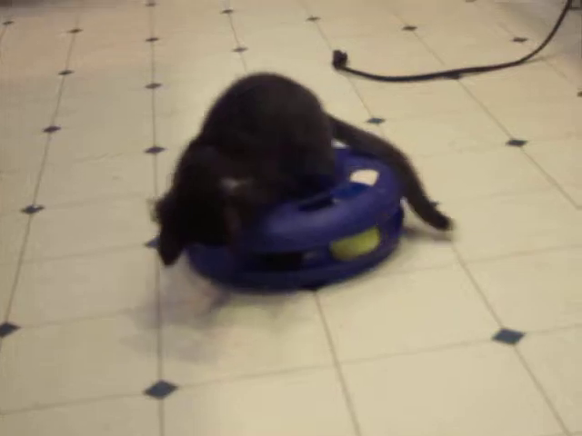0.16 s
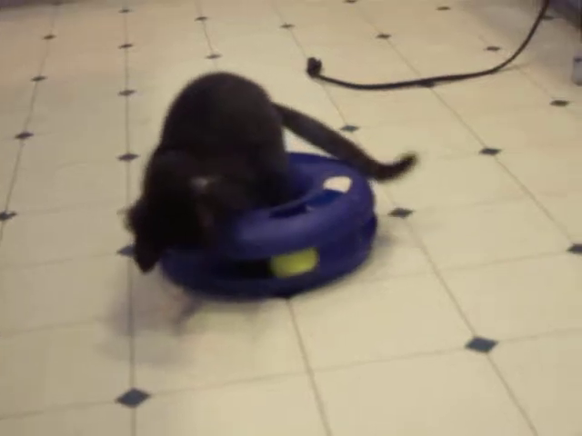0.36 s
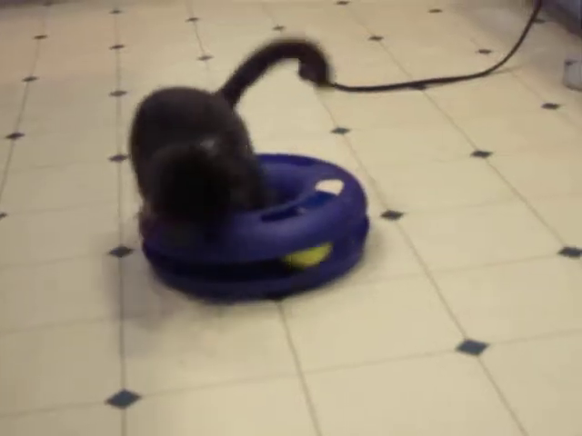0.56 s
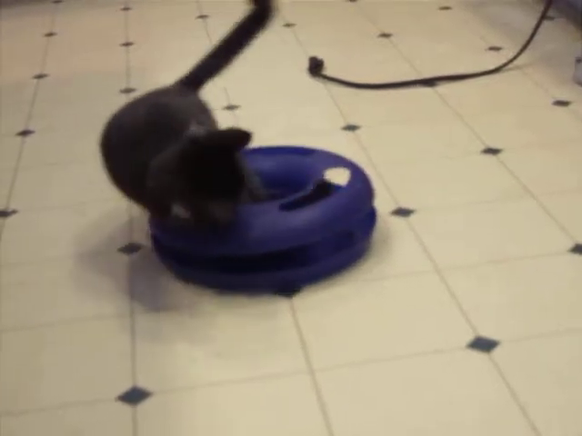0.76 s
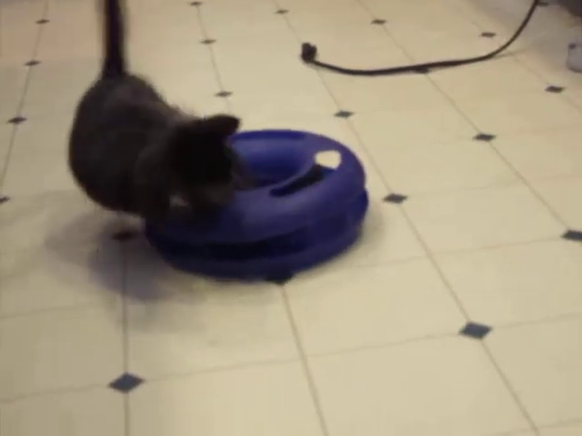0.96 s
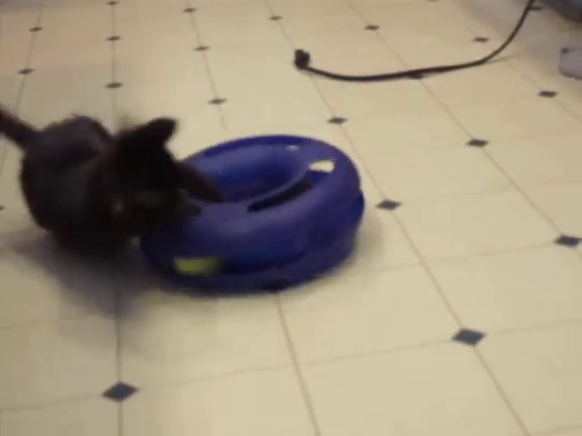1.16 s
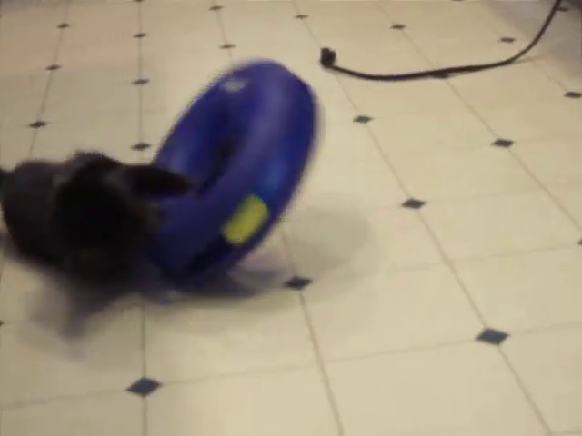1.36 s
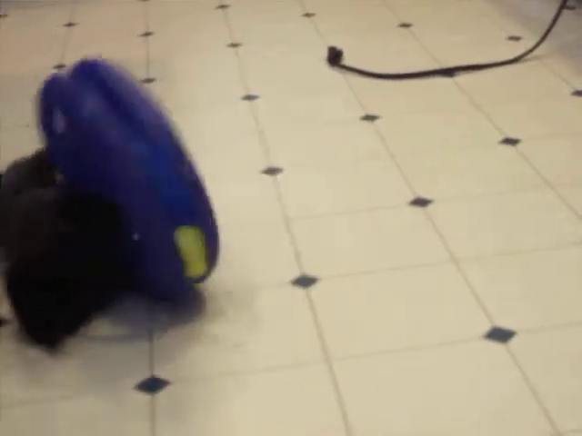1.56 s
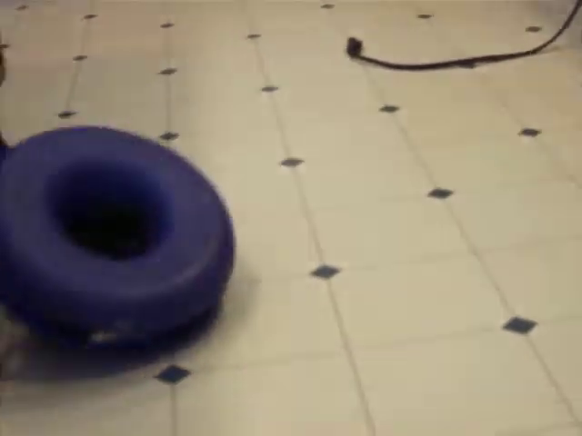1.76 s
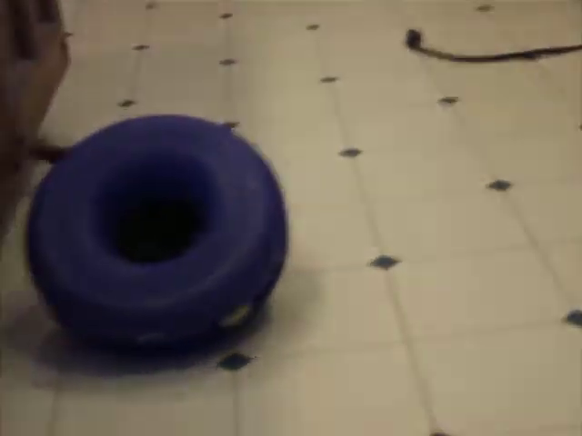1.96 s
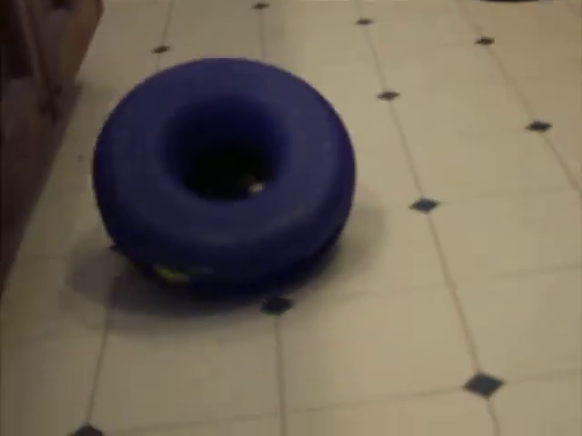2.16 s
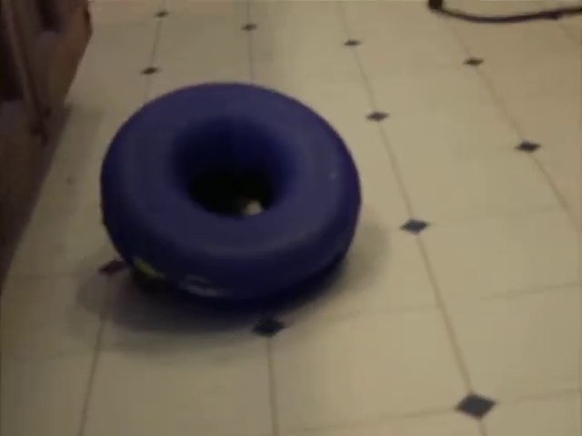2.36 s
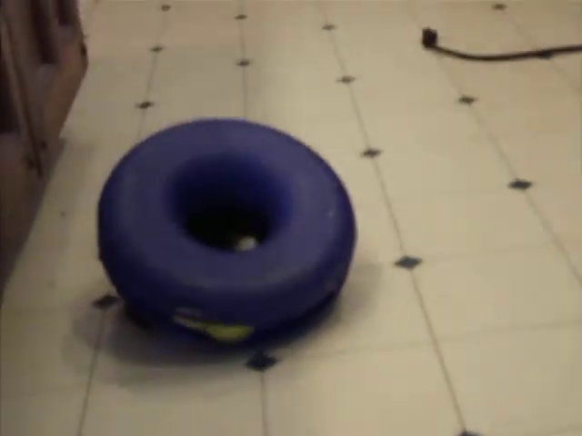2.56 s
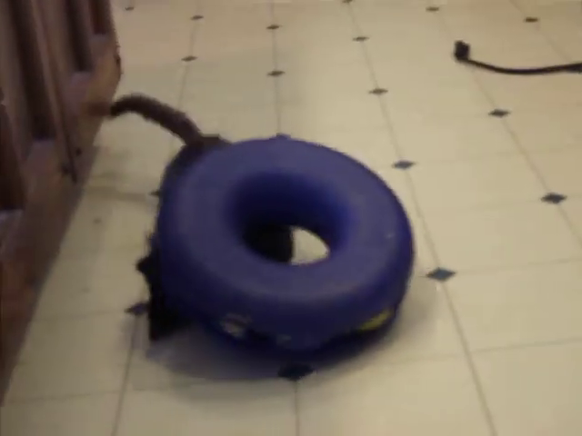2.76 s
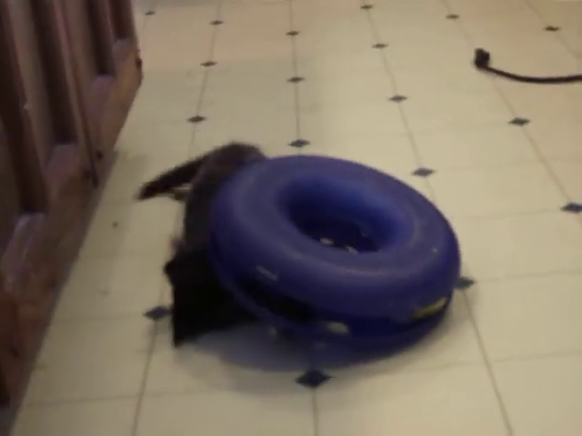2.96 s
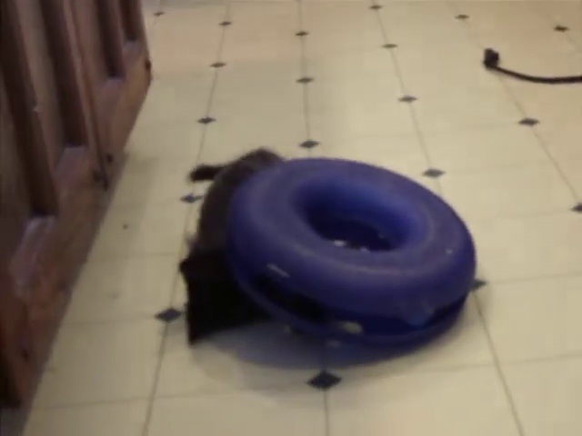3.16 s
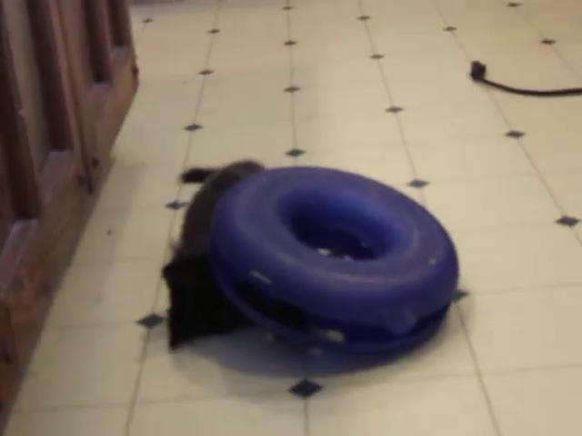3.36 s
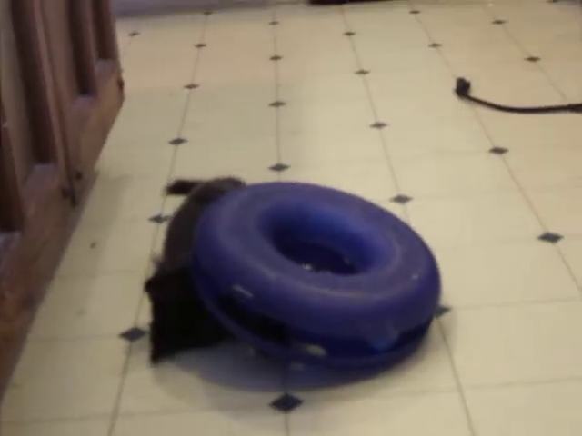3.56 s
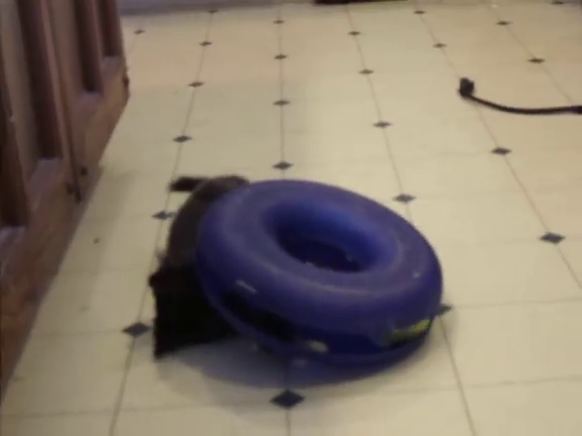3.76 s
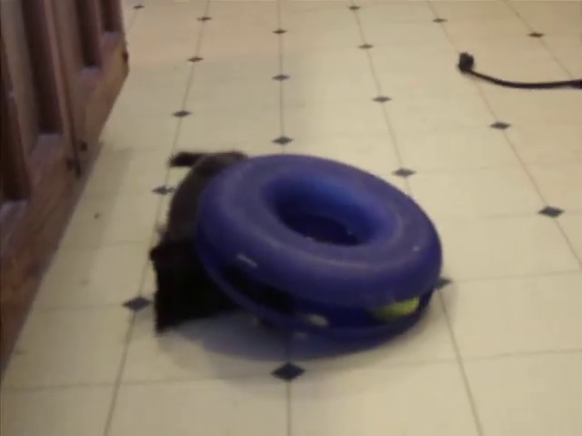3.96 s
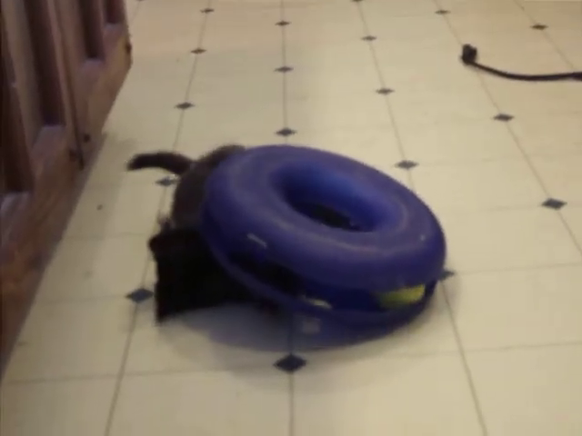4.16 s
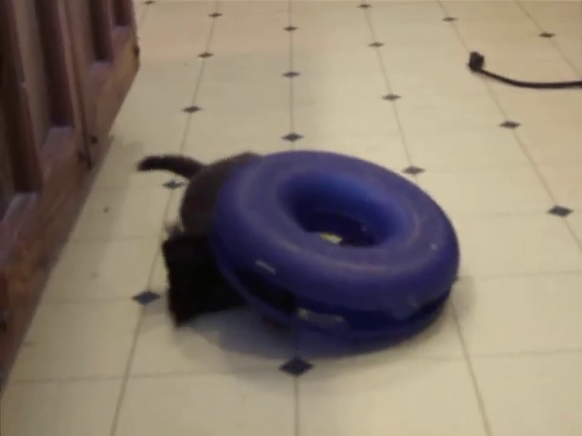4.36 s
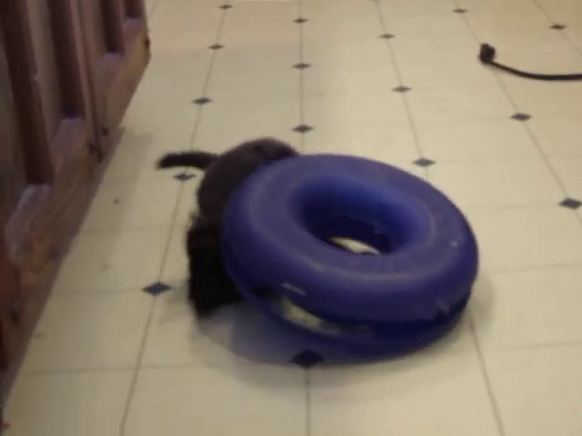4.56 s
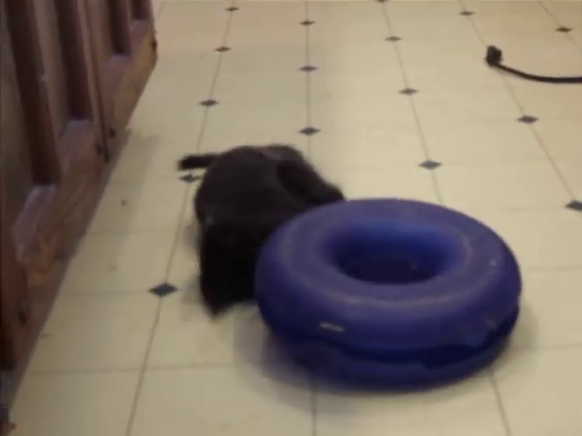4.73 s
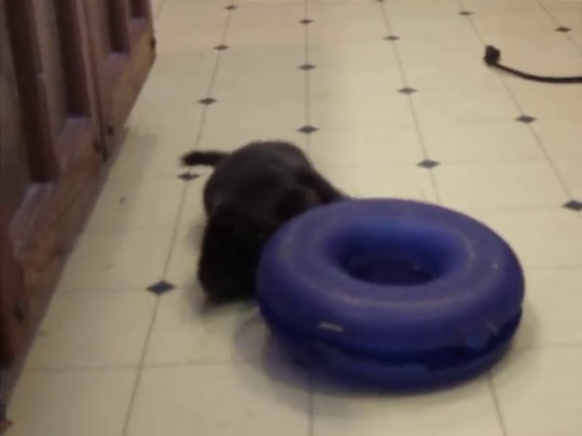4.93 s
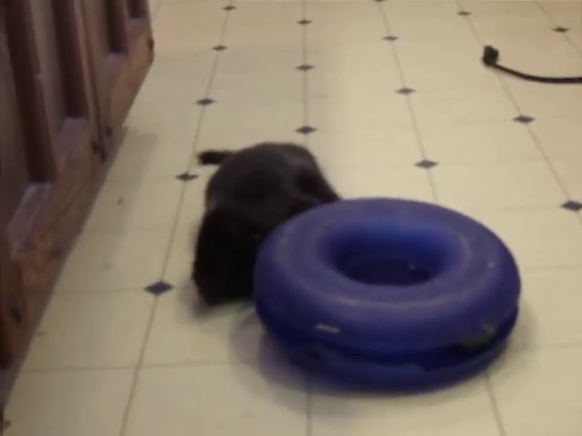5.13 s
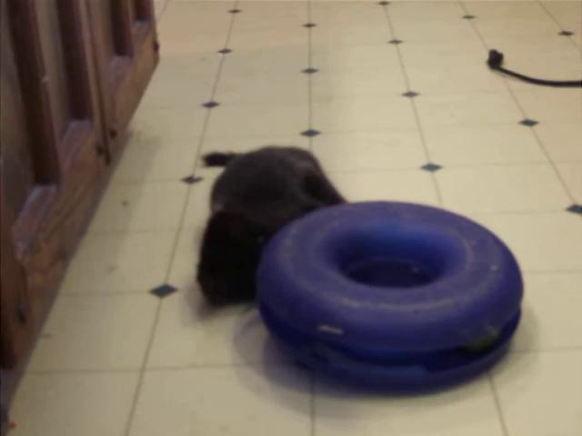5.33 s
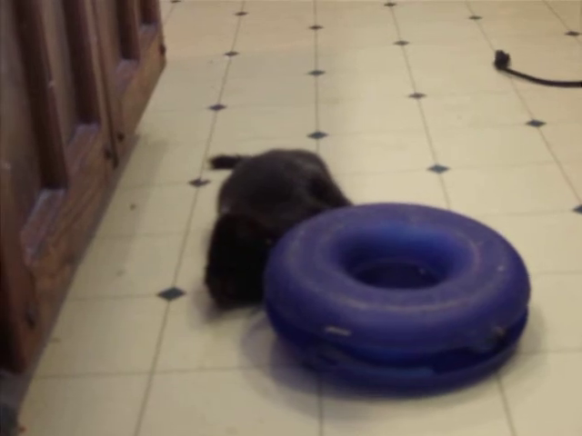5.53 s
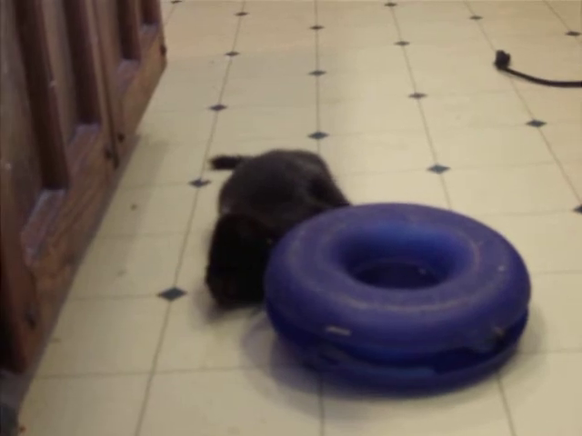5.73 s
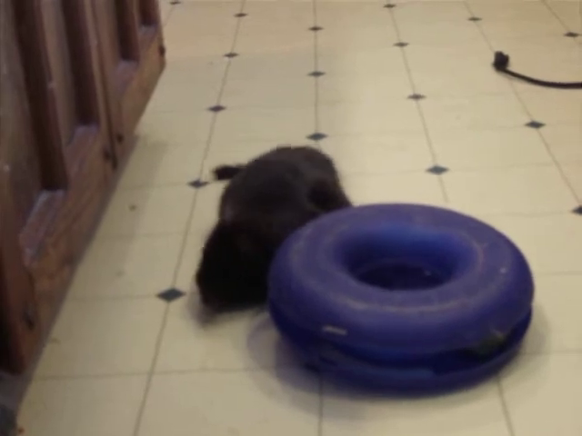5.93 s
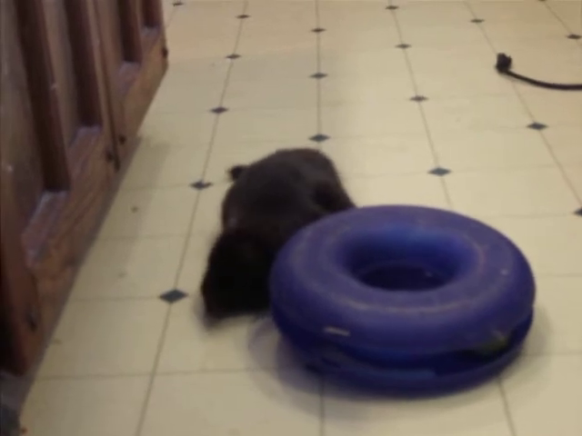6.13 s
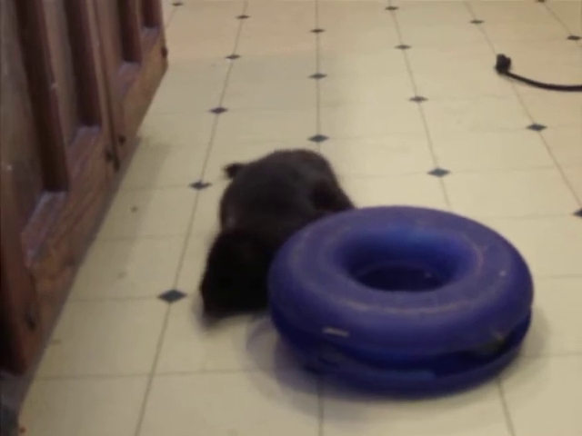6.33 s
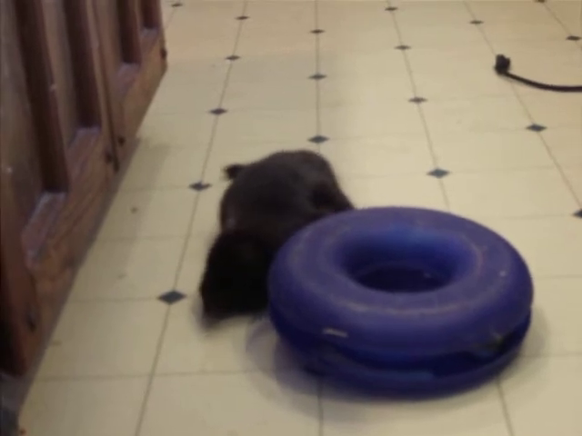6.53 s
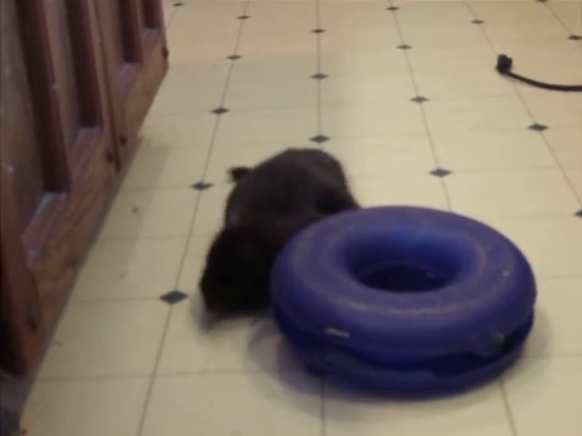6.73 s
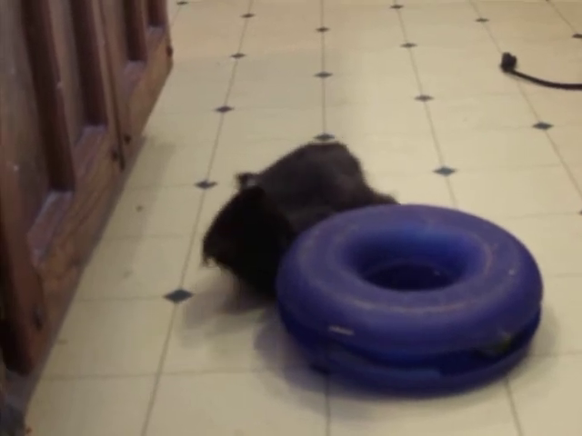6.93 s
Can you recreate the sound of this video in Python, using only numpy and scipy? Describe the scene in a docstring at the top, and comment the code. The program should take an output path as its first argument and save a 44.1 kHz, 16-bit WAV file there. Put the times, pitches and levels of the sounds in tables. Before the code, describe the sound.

A kitten shoves a hollow plastic ring toy on a tiled kitchen floor. The ball rolls and rattles in its track amid quick clacks and soft paw thuds. The toy tips over with a sharp knock and a short scrape, then after a lull a second, softer clatter thins out to light taps. The small hard room echoes briefly, and a hand-held microphone picks up steady hiss, a faint appliance hum and a thin high whine.

```python
"""Kitten and ball-track toy

A kitten shoves, tips over and crawls under a hollow plastic ring with a ball in its track, on a tiled
kitchen floor. Blows of rim and ball ring the shell; between them the ball rolls and the rim scrapes.
Paws thud, something clinks once, and the small hard room answers. An appliance hums, a thin whine
flutters high above it, and a hand-held camera adds hiss and a few dull knocks of its own."""
import sys
import numpy as np
from scipy import signal
from scipy.fft import rfft, irfft
from scipy.io import wavfile
from scipy.ndimage import uniform_filter1d

SR = 44100
rng = np.random.default_rng(int(sys.argv[2]) if len(sys.argv) > 2 else 0)


def generate_wav(sig):
    """Save sig (samples, or channels by samples) to the path in sys.argv[1] as 16-bit PCM at SR."""
    pcm = np.round(np.clip(np.atleast_2d(sig).T, -1, 1) * 32767).astype(np.int16)
    wavfile.write(sys.argv[1], SR, pcm)


N = 308192
HOLLOW_HZ = 1060  # usual centre of the shell's hollow ring
TOP_HZ = 8350  # upper edge of the audible treble


def undb(db):
    return 10 ** (np.asarray(db) / 20)


def unit(x):
    return x / np.sqrt(np.mean(x ** 2))


def band(x, lo_hz, hi_hz, order=3):
    sos = signal.butter(order, [lo_hz, min(hi_hz, .45 * SR)], "band", fs=SR, output="sos")
    return signal.sosfilt(sos, x)


def fade(t, t60):
    return np.exp(-np.log(1000) * t / t60)


def walk(rate_hz):
    """A smooth random drift at unit rms: held steps, slewed twice."""
    hold = int(SR / rate_hz)
    steps = np.repeat(rng.standard_normal(N // hold + 1), hold)
    return unit(uniform_filter1d(uniform_filter1d(steps, hold), hold)[:N])


def add(track, at_s, sound):
    i = int(at_s * SR)
    track[i:i + len(sound)] += sound[:N - i]


def hiss(level_db=-52.5):
    """The camera's even bed of noise, darker towards the top."""
    # The colour of the hiss. Each row: frequency in Hz, relative density in dB.
    spectrum = [(20, -18), (70, -14.5), (115, -11), (150, -15), (210, -11.5), (400, -14.5), (650, -15.5),
                (1000, -16.5), (1500, -19.5), (4000, -21), (8000, -17.5)]
    hz, db = np.transpose(spectrum)
    colour_db = np.interp(np.log(np.fft.rfftfreq(N, 1 / SR) + 1), np.log(hz), db)
    noise = irfft(rfft(rng.standard_normal(N)) * undb(colour_db), N)
    return unit(band(noise, 5.3, 6740)) * undb(level_db + 0.31 * walk(5))


def appliance_hum():
    """An appliance holds two tones that waver slightly in level and phase."""
    # The tones of the hum. Each row: frequency in Hz, centre rms level in dB.
    tones = [(333.8, -62), (764.4, -68.5)]
    t = np.arange(N) / SR
    return np.sqrt(2) * sum(undb(db + 1.6 * walk(8)) * np.sin(2 * np.pi * hz * t + .5 * walk(10))
                            for hz, db in tones)


def thin_whine(flutter_hz=29.97, lift_db=2.5):
    """A thin whine at 7874 Hz with a fainter tone just above it, both fluttering 30 times a second."""
    # The whine, then the fainter tone. Each row: frequency in Hz, rms level in dB before the lift.
    tones = [(7874, -59.5), (8126, -62)]
    t = np.arange(N) / SR
    flutter = np.tanh(10 * np.sin(np.pi * flutter_hz * t))  # dips briefly each time its sign flips
    pair = sum(undb(db) * np.sin(2 * np.pi * hz * t) for hz, db in tones)
    return np.sqrt(2) * undb(lift_db) * flutter * pair


def shell_ring(hollow_hz, modes_db, crack_db, crack_t60, place_db=2):
    """One contact rings the shell in four registers; where it lands decides which modes speak."""
    # Bands of crowded modes: thud, hollow ring, clack, tick.
    # Each row: low edge in Hz, high edge in Hz, t60 in seconds.
    registers = [(104, 465, 0.15), (701, 1303, 0.13), (1505, 3270, .065), (3060, 8300, 0.048)]
    # Modes that stand out of the crowd. Each row: pitch in Hz, relative level in dB, t60 in seconds.
    shell_modes = [(144.5, -1.5, 0.16), (173.7, -6, 0.43), (225.4, -2.5, 0.38), (362.7, 7, 0.1),
                   (576, 1.5, 0.076), (776.5, 8, 0.04), (849, -9.5, 0.098), (981.3, 0.5, 0.13),
                   (1083.6, 1.5, 0.14), (1177, 2, 0.083), (1263, -17, 0.13), (1457, -6, 0.067),
                   (1505, -2, 0.081), (1602, -1.5, 0.054), (1712, -0.5, 0.097), (1901, 2.5, 0.061),
                   (2156, -2.5, 0.11), (2450, -9, 0.066), (2710, -11.5, 0.039), (2794, 0, 0.063),
                   (3033, -5.5, 0.12), (3320, -11, 0.24), (4220, -11.5, 0.18), (4810, -21, 0.06),
                   (5180, -16.5, 0.06), (6820, 0, 0.05), (7200, 8.5, 0.016)]
    t = np.arange(SR // 4) / SR
    modes, rings = 0, []
    for hz, db, t60 in shell_modes:
        detune, weight = rng.standard_normal(2)
        cycles = hz * (1 + 0.0063 * detune) * t + rng.random()
        modes = modes + undb(db + place_db * weight) * fade(t, t60) * np.sin(2 * np.pi * cycles)
    for (lo, hi, t60), shift in zip(registers, [1, hollow_hz / HOLLOW_HZ, 1, 1]):
        envelope = fade(t, t60) + undb(crack_db) * fade(t, crack_t60)
        crowd = unit(band(rng.standard_normal(len(t)), lo * shift, hi * shift)) * envelope
        ring = band(crowd + undb(modes_db) * modes, lo * shift, hi * shift)
        rings.append(ring / np.sqrt(np.sum(ring ** 2) / (SR // 100)))  # energy of 10 ms at unit level
    return np.array(rings)


def kitchen(x, wet_db=-6, low_t60=0.52, high_t60=0.37, build_s=0.007):
    """Hard floor and cupboards add a short diffuse tail, different for every spot that sounds."""
    t = np.arange(SR // 2) / SR
    low = band(rng.standard_normal(len(t)), 160, 2500) * fade(t, low_t60)
    high = band(rng.standard_normal(len(t)), 2500, 12000) * fade(t, high_t60)
    tail = (low + undb(-0.5) * high) * (1 - np.exp(-(t / build_s) ** 2))
    response = undb(wet_db) * tail * np.sqrt(2 * TOP_HZ / SR / np.sum(tail ** 2))
    response[0] += 1  # the direct sound
    return signal.fftconvolve(x, response[None], axes=1)


def voicing(at, strength_db, hardness_db, usual_db=-45):
    """The four registers in dB: hard contacts tick, soft ones ring hollow, strong ones clack."""
    thud_growth, clack_growth, clack_per_hardness = 0.74, 1.11, .03  # dB per dB
    # Until it flips, the toy stands on its base under the kitten's weight and thuds more.
    flip_s, upright_db = 1.9, 4.5
    force_db = strength_db - usual_db
    thud = usual_db + thud_growth * force_db + upright_db * (at < flip_s)
    clack = usual_db + clack_growth * force_db + clack_per_hardness * hardness_db
    return np.array([thud, strength_db - hardness_db / 2, clack, strength_db + hardness_db / 2])


def shove_gains(attack_s=0.021, sag_db_per_s=11, release_t60=0.18):
    """Each register's gain over time: shoves build up, slacken and die away, and their powers add."""
    # Shoves that set the ball rolling and the rim scraping.
    # Each row: start in seconds, length in seconds, strength in dB, hardness in dB.
    shoves = [(0.167, 0.16, -58.5, 6), (0.516, 0.071, -41, 4.5), (0.602, 0.034, -47.5, 9),
              (0.644, 0.038, -37, 16), (0.72, 0.11, -39, 0.5), (0.842, 0.12, -46, 3),
              (0.976, 0.14, -48, -4), (1.25, 0.12, -47.5, -3.5), (1.39, 0.26, -51, 0),
              (1.763, 0.16, -49, -1.5), (1.982, 0.057, -36, -7.5), (2.041, 0.051, -40, -6),
              (2.133, 0.078, -47.5, 1), (2.583, 0.27, -49, -2.5), (2.754, 0.097, -43.5, -4.5),
              (2.908, 0.34, -57, -3), (4.397, 0.15, -50.5, 1.5), (4.65, 0.21, -43, -1),
              (5.044, 0.14, -55.5, -9), (5.378, 0.14, -60, -14)]
    # The balance of a shove: offsets in dB for thud, hollow ring, clack and tick.
    share_db = [-12, -3.5, -6.5, -1]
    t, power = np.arange(SR) / SR, np.zeros((4, N))
    for start, length, strength_db, hardness_db in shoves:
        release = fade(np.maximum(t - length, 0), release_t60)
        envelope = np.minimum(t / attack_s, 1) * undb(-sag_db_per_s * t) * release
        gains = undb(voicing(start, strength_db, hardness_db) + share_db)
        for track, gain in zip(power, gains):
            add(track, start, (gain * envelope) ** 2)
    return np.sqrt(power)


def roll_and_scrape(contacts_per_s=1700, spread_db=3.0, judder_db=2.5, places=4):
    """Ball and rim feed a stream of tiny uneven contacts into several places on the shell."""
    rattle, judder = 0, judder_db * walk(70)
    for _ in range(places):
        contacts = (rng.random(N) < contacts_per_s / places / SR) * rng.choice([-1, 1], N)
        contacts = contacts * undb(spread_db * np.minimum(rng.exponential(size=N), 4) + judder)
        ring = kitchen(shell_ring(HOLLOW_HZ, modes_db=-3.5, crack_db=12.5, crack_t60=0.0095))
        rattle = rattle + signal.oaconvolve(contacts[None], ring, axes=1)[:, :N]
    return sum(unit(register) * gain for register, gain in zip(rattle, shove_gains()))


def blows(heavy_db=-40, rebound_s=.005, rebound_db=-6.5, rebound_hardness_db=-6.5):
    """Rim on tile, ball on track, claws on plastic: a short crack, then the shell rings."""
    # Blows on the toy. Each row: start in seconds, strength in dB, hardness in dB (a tilt from
    # hollow ring towards tick), centre of the hollow ring in Hz.
    hits = [(0.186, -49.5, -2.5, 890), (0.552, -41.5, -3, 1100), (0.565, -34.5, 8, 1030),
            (0.652, -33.5, -10, 980), (0.666, -32.5, -5, 870), (0.685, -40.5, 7, 990),
            (0.717, -26, 3.5, 1120), (0.744, -30, 3.5, 1170), (0.771, -35.5, -1, 1180),
            (0.887, -40.5, -7, 1100), (0.964, -43, -2, 1070), (1.027, -48, 0, 1200), (1.101, -53, 10, 1000),
            (1.148, -41.5, -2.5, 1330), (1.164, -48.5, 12, 1200), (1.275, -50, 10, 1080),
            (1.292, -49.5, 1, 1120), (1.499, -34.5, 5.5, 1080), (1.567, -45, 0, 970),
            (1.583, -46, -4, 1240), (1.663, -29, -4, 1216), (1.703, -41, -0.5, 955),
            (1.714, -44, -21.5, 950), (1.821, -49.5, 13, 1150), (1.956, -47, -10.5, 1080),
            (2.023, -25, -1.5, 1163), (2.074, -37, -4, 1090), (2.484, -55.5, 1, 1030),
            (2.738, -40, -4, 1005), (2.765, -35, -1.5, 1075), (2.798, -43.5, -11, 995),
            (3.707, -51, 3, 1040), (3.79, -54, 1, 1070), (4.148, -53, 3, 1020), (4.394, -46.5, 16.5, 1010),
            (4.459, -50, 13, 1050), (4.483, -52, 8, 1120), (4.668, -45, 11, 1130), (4.711, -47.5, 12, 1020),
            (4.748, -37.5, -4.5, 1030), (4.785, -34.5, -2, 1035), (4.823, -44, 11.5, 960),
            (4.903, -46, -1, 1030), (4.99, -56, 17, 1050), (5.023, -46, -1, 1060), (5.131, -55, -11, 1010),
            (5.188, -45.5, -11, 1110), (5.21, -48, -11, 1080), (5.366, -46, 1.5, 1010),
            (5.401, -54, 6, 940), (5.434, -45.5, 2, 1050), (5.621, -59.5, -14, 1020),
            (5.766, -49.5, 0.5, 1040), (5.975, -56, -6, 955), (6.161, -50.5, -3, 1000)]
    # The balance of a blow: offsets in dB for thud, hollow ring, clack and tick.
    share_db = [-10.5, 0.5, -4.5, 1.5]
    # After a heavy blow of the rim, the ball strikes its track a moment later, softer and duller.
    rebounds = [(at + rebound_s, db + rebound_db, hardness_db + rebound_hardness_db, hz)
                for at, db, hardness_db, hz in hits if db > heavy_db]
    out = np.zeros(N)
    for at, strength_db, hardness_db, hollow_hz in list(hits) + rebounds:
        ring = shell_ring(hollow_hz, modes_db=-3, crack_db=7, crack_t60=.018)
        gains = undb(voicing(at, strength_db, hardness_db) + share_db)
        add(out, at, gains @ kitchen(ring))
    return out


def camera_knocks(rise_s=0.0001):
    """Fingers on the camera body: dull, dry, quickly damped, with little below their own pitch."""
    # Finger knocks. Each row: start in seconds, pitch in Hz, level in dB before filtering,
    # t60 in seconds.
    knocks = [(0.3115, 800, -11, 0.011), (1.223, 900, -26.5, 0.0077), (1.3857, 333, -23.5, 0.016),
              (1.3925, 200, -21.5, 0.028)]
    out, t = np.zeros(N), np.arange(SR // 10) / SR
    for at, hz, db, t60 in knocks:
        ring = np.sin(2 * np.pi * hz * t) * fade(t, t60) * (1 - np.exp(-t / rise_s))
        add(out, at, -undb(db) * band(ring, .56 * hz, 3 * hz, order=4))
    return out


def soft_bumps():
    """Paws and the toy's weight on the floor reach only the lowest modes of the shell."""
    # Soft, heavy contacts. Each row: start in seconds, level in dB.
    bumps = [(0.539, -37.5), (0.567, -35), (0.72, -29), (1.0, -39.5), (1.1, -39), (1.15, -39), (1.191, -47),
             (1.581, -44.5), (1.667, -31.5), (1.956, -44), (3.05, -54), (3.239, -51), (3.62, -54),
             (3.79, -52), (4.501, -50.5), (4.667, -44), (5.4, -58), (6.161, -59)]
    out = np.zeros(N)
    for at, db in bumps:
        thud = shell_ring(HOLLOW_HZ, modes_db=3, crack_db=8, crack_t60=0.049)[:1]
        add(out, at, undb(db) * kitchen(thud)[0])
    return out


def rim_skids(slips_per_s=1500):
    """The rim sticks and slips unevenly on the tile and rasps in one narrow resonance."""
    # Skids across the tile. Each row: start in seconds, end in seconds, dry level at the crest in dB.
    skids = [(1.959, 2.062, -36), (2.084, 2.263, -50), (3.193, 3.248, -51)]
    out = np.zeros(N)
    for start, end, db in skids:
        size = int((end - start) * SR)
        slips = (rng.random(size) < slips_per_s / SR) * rng.random(size)
        rasp = unit(band(slips, 1960, 2610, order=2))
        add(out, start, undb(db) * rasp * np.hanning(size))
    return kitchen(out[None])[0, :N]


def clink(at_s=4.394):
    """Something small and hard is touched once and rings briefly."""
    # Its bright modes. Each row: pitch in Hz, dry peak level in dB, t60 in seconds.
    modes = [(3310, -41, .1), (4690, -42, .11), (5170, -42, .1)]
    out, t = np.zeros(N), np.arange(SR // 3) / SR
    ring = sum(undb(db) * fade(t, t60) * np.sin(2 * np.pi * hz * t) for hz, db, t60 in modes)
    add(out, at_s, kitchen(ring[None])[0])
    return out


def scene():
    """The toy in the kitchen and the knocks on the camera over a steady bed, in mono."""
    bed = hiss() + appliance_hum() + thin_whine()
    action = roll_and_scrape() + rim_skids() + clink() + camera_knocks() + blows() + soft_bumps()
    return (bed + action)[None]


def record(dry, start_s=.065):
    """The sound cuts in after a moment of silence, rounds off towards 8 kHz and has no top octave."""
    running = np.arange(N) / SR > start_s
    round_off = signal.butter(10, 7950, fs=SR, output="sos")
    top_cut = signal.cheby2(14, 50, TOP_HZ + 1100, fs=SR, output="sos")
    return signal.sosfilt(top_cut, signal.sosfilt(round_off, dry * running))


dry = scene()
out = record(dry)
generate_wav(out)
```